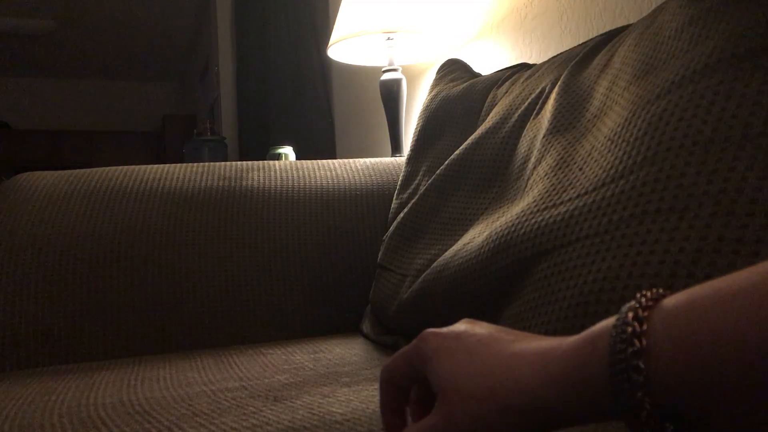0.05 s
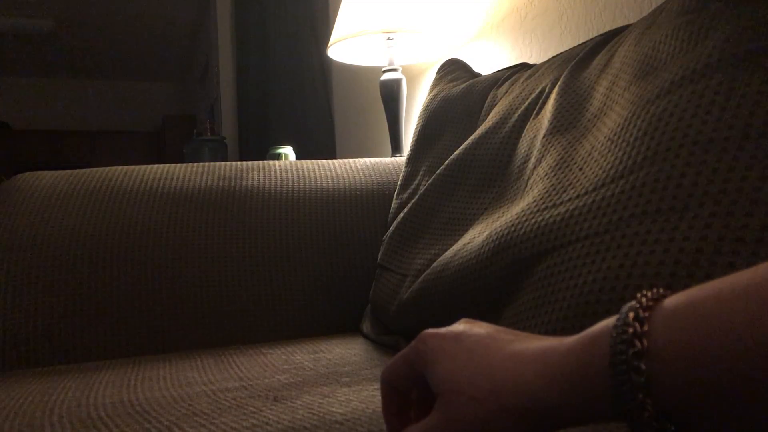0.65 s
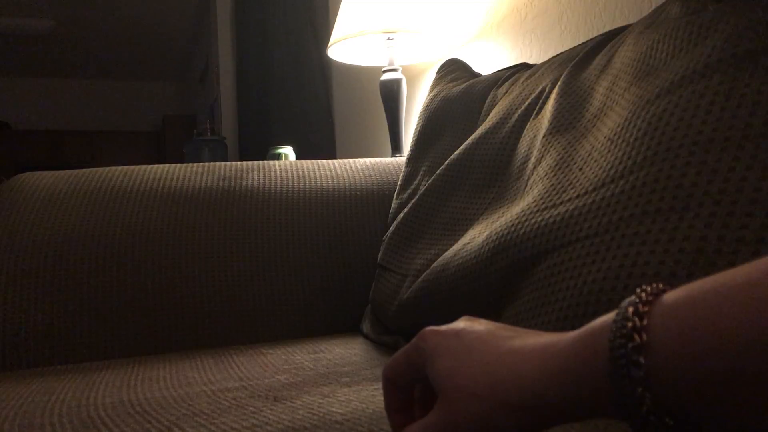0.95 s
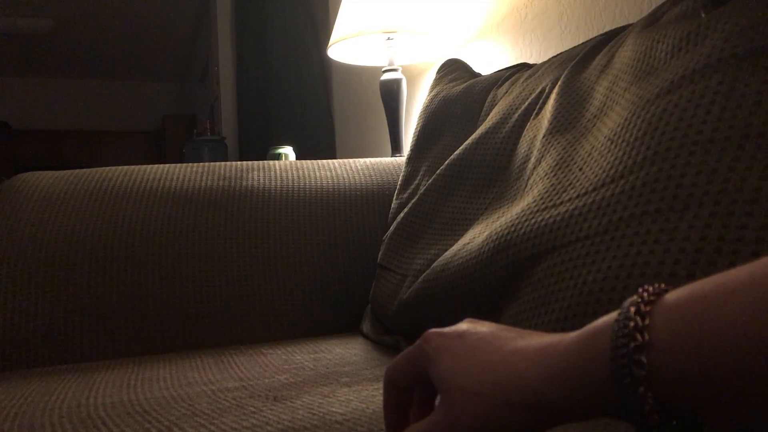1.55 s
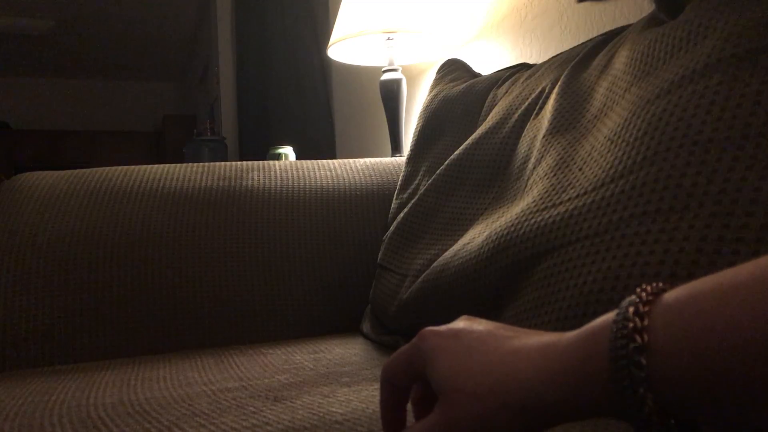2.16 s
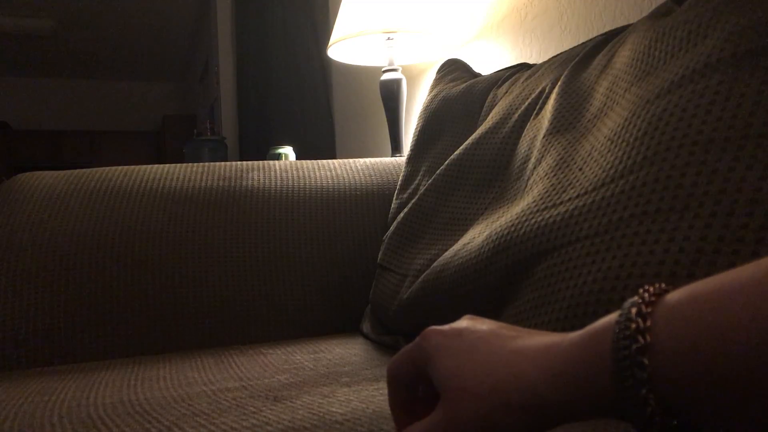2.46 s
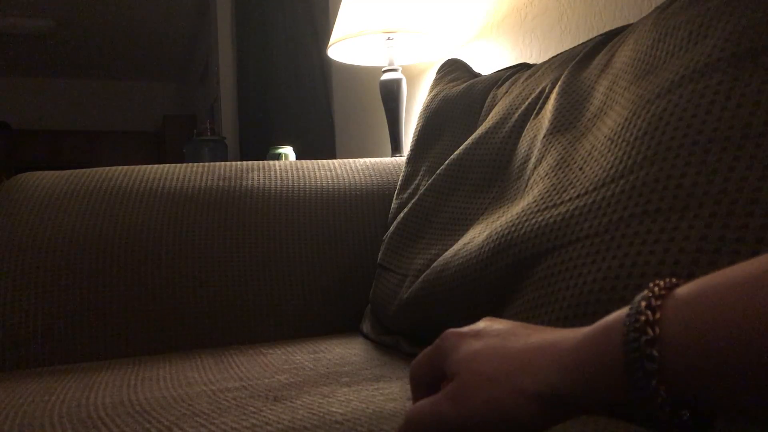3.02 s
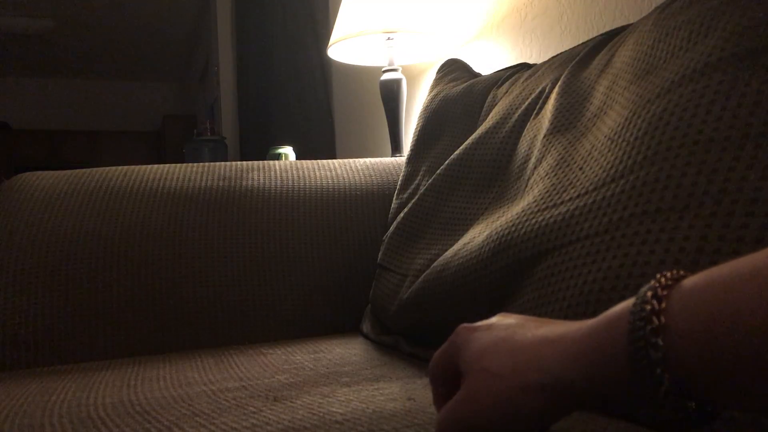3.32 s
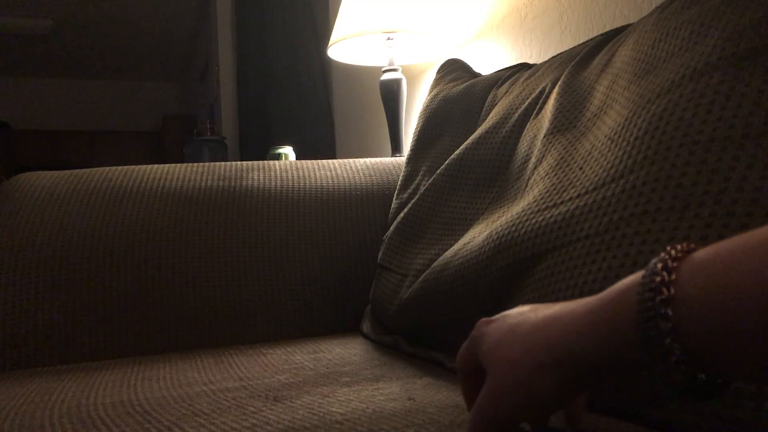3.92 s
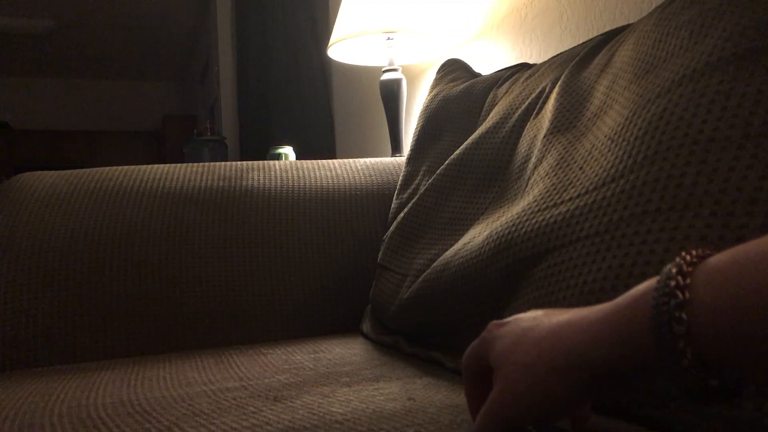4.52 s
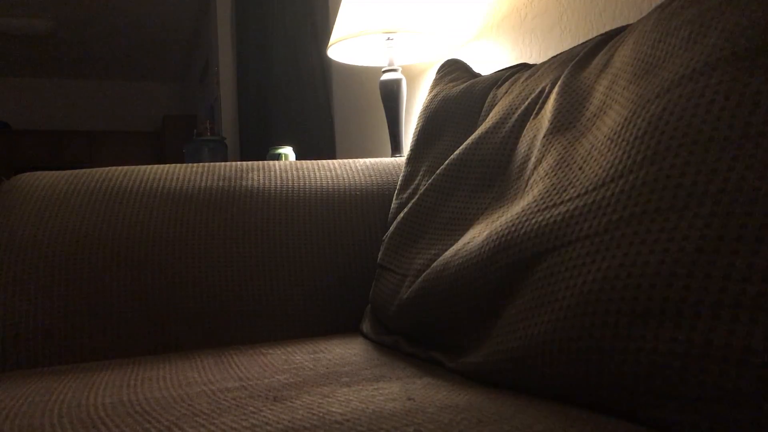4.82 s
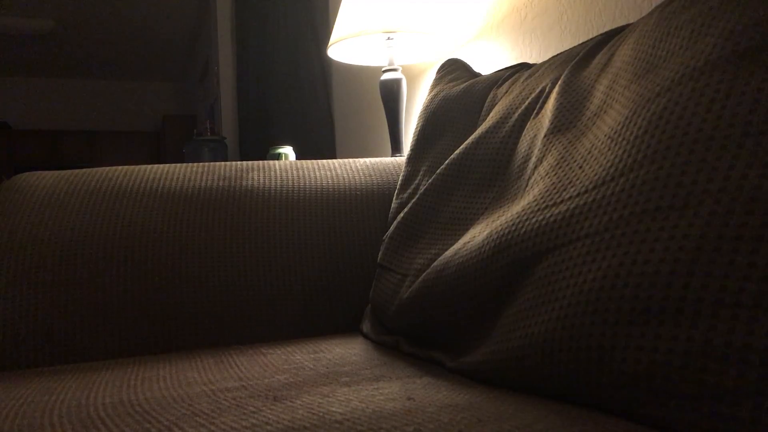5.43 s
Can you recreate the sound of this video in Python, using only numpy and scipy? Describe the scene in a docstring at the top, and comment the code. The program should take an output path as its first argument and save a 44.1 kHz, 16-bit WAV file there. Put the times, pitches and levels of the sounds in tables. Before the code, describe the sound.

Claws scratch lightly at a woven couch cover with small ticks and soft thumps, ending in a hand's sweep, over a low hum.

```python
"""Light scratching, close by, ticks and rasps as claws work to and fro on the woven cover of a couch.
The sound is stick-slip friction: each stroke rubs over the weave and catches threads; a thread that
slips free ticks, and the padding thumps with it. At the end a hand sweeps softly over the cover.
Behind it lies a quiet living room with a mains hum and a faint fan."""
import sys
import numpy as np
from scipy import signal
from scipy.fft import rfft, irfft
from scipy.io import wavfile

SR = 44100
rng = np.random.default_rng(int(sys.argv[2]) if len(sys.argv) > 2 else 0)


def wrap_up_sound(samples):
    """Save the sound to the file named by the first command line argument, as 16-bit audio."""
    columns = np.atleast_2d(samples).T
    # keep every value between -1 and 1, then stretch to whole-number steps
    tamed = np.clip(columns, -1, 1)
    steps = np.round(tamed * 32767).astype(np.int16)
    wavfile.write(sys.argv[1], SR, steps)


N = 250488

# loud threads slipping free: (time [s], cloth tick [dB], padding thump [dB], fibre crack [dB])
SNAPS = [(0.0077, -40.5, -55, -53), (0.0751, -33.5, -44, -55), (0.277, -32.5, -42, -46),
         (0.3127, -37, -35, -51), (0.3271, -38, -44, -45.5), (0.4007, -44, -37, -61),
         (0.5372, -34.5, -35, -53), (0.591, -44, -37.5, -48.5), (0.741, -39, -43.5, -46),
         (0.9552, -35.5, -44.5, -46), (1.0114, -34, -36.5, -52), (1.1796, -34.5, -45.5, -49),
         (1.1934, -40.5, -42, -48), (1.2327, -46, -45, -49), (1.2499, -30, -33.5, -39),
         (1.2666, -38.5, -47, -48), (1.319, -37.5, -46, -44), (1.3337, -41, -43.5, -43),
         (1.4487, -36.5, -43, -50.5), (1.4649, -37.5, -37, -43), (1.499, -34.5, -35.5, -43),
         (1.5178, -33, -38, -41.5), (1.5712, -40.5, -39.5, -59), (1.5795, -35, -45, -40),
         (1.6318, -45, -46, -43.5), (1.7104, -39.5, -49, -53), (1.8106, -44.5, -42, -50),
         (1.9643, -40, -44, -57), (2.2025, -35.5, -45.5, -45), (2.3828, -42, -45, -56),
         (2.4431, -37.5, -39.5, -47), (2.4622, -48, -62, -41.5), (2.4777, -37.5, -47.5, -47),
         (2.7137, -40, -62, -42.5), (2.7996, -33, -50.5, -53), (2.8958, -35.5, -41.5, -70),
         (2.9413, -42.5, -52, -50), (3.0178, -33.5, -35, -54), (3.0355, -35, -41, -46),
         (3.0571, -35.5, -32, -43), (3.1093, -40, -38, -57), (3.1698, -39, -37.5, -67),
         (3.1802, -37, -31.5, -45), (3.2768, -33, -29, -54), (3.306, -32, -28, -67),
         (3.3363, -28.5, -52, -43.5), (3.5269, -37.5, -36.5, -47), (3.565, -30.5, -31, -40.5),
         (3.5857, -37, -41, -43), (3.789, -41.5, -40, -55), (3.8123, -28.5, -24.5, -36.5),
         (3.818, -34.5, -31.5, -55), (3.8412, -38.5, -34.5, -44), (3.9975, -37.5, -39, -49),
         (4.033, -38, -43.5, -45), (4.1906, -44, -58, -52), (4.211, -36, -36.5, -47.5),
         (4.2231, -36, -32.5, -51), (4.258, -36.5, -57, -55), (4.413, -39.5, -38, -51.5),
         (4.4313, -38.5, -34, -57), (4.462, -33.5, -48, -54), (4.4831, -40, -35, -54),
         (4.6621, -41, -42.5, -61), (4.6855, -34.5, -39.5, -47.5), (4.6942, -36.5, -38, -51)]
# the cloth's response to one slip: (frequency [Hz], gain [dB])
SNAP_SPECTRUM = [(70, 1.5), (170, 34.5), (320, 38), (460, 28.5), (580, 33), (780, 20), (960, 29),
                 (1250, 20.5), (1900, 21.5), (2600, 12), (3500, 11.5), (5800, 10.5), (9000, 7), (16000, -8)]
# claws dig into the cover and draw back about four times a second; a return lasts until the next dig:
# (start of dig [s], turn [s], rasp of dig [dB], rasp of return [dB])
SCRATCHES = [(-0.03, 0.093, -64, -65), (0.22, 0.36, -61.5, -64), (0.46, 0.588, -64.5, -68),
             (0.689, 0.798, -62.5, -65.5), (0.912, 1.037, -63, -66), (1.139, 1.29, -61, -62),
             (1.398, 1.547, -62.5, -59), (1.648, 1.762, -61, -65), (1.88, 2.021, -68.5, -68),
             (2.14, 2.26, -65.5, -77), (2.42, 2.559, -62, -75), (2.687, 2.84, -64.5, -63),
             (2.959, 3.122, -62, -59.5), (3.24, 3.38, -56, -61), (3.499, 3.626, -64.5, -63),
             (3.759, 3.879, -59.5, -65.5), (3.959, 4.07, -68.5, -67), (4.193, 4.311, -62, -68),
             (4.397, 4.528, -59.5, -62), (4.638, 4.719, -59, -81)]
# body of the rubbing noise: (frequency [Hz], relative density [dB])
RASP_SPECTRUM = [(130, -5), (190, 6), (330, 16.5), (460, 5), (600, 7), (780, 0), (1000, -0.5), (1400, -1.5),
                 (2100, -8.5), (2900, -18), (3500, -15), (4800, -28), (7000, -30.5)]
# fibre hiss of the rubbing: (frequency [Hz], relative density [dB])
HISS_SPECTRUM = [(2500, -38), (4000, 1), (5800, 2.5), (9200, 3.5), (11700, -2.5), (16000, -9.5)]
# the cushion gives under a harder push: (time [s], relative peak [dB], resonance [Hz])
PUSHES = [(0.135, -45.5, 241), (0.384, -40.5, 255), (0.582, -40.5, 315), (3.291, -37, 176),
          (3.423, -37.5, 180), (3.699, -39, 187), (3.834, -36, 171), (4.222, -35.5, 173),
          (4.481, -39.5, 187), (4.555, -41, 176), (4.575, -41, 288)]
# tiny hard contacts: (time [s], peak level [dB])
CLICKS = [(2.9404, -37)]
# envelope of the hand's sweep: (time [s], level [dB])
SWEEP_LEVEL = [(4.7, -90), (4.74, -66.5), (4.8, -62), (4.85, -71.5), (4.95, -65.5), (5.12, -63),
               (5.25, -67), (5.4, -67.5), (5.55, -70.5), (5.68, -74)]
# its soft swish: (frequency [Hz], relative density [dB])
SWEEP_SPECTRUM = [(200, -3), (450, 3), (750, -5), (1050, 0), (1450, -5.5), (2100, -7.5), (3000, -12.5),
                  (4500, -21), (6000, -21.5), (9000, -19.5), (11000, -24), (16000, -25)]
# bands where the sound thins: (frequency [Hz], bandwidth [Hz], depth [0-1])
DIPS = [(2880, 400, .48), (4650, 950, .65), (7700, 900, .3), (10400, 900, .4)]
# envelope of the motor's drone: (time [s], rms level [dB])
DRONE_LEVEL = [(0, -63), (.3, -48.5), (1.9, -51), (2.2, -45), (3.1, -43.5), (3.5, -46.5), (4.0, -49),
               (5.68, -48)]
# humming appliances: (frequency [Hz], rms level [dB], unsteadiness [dB])
HUM_LINES = [(117.3, -56, 3), (117.9, -59, 2), (174.7, -62.5, -1.5), (239.6, -62.5, 2.5)]
# a fan's airy tones: (frequency [Hz], bandwidth [Hz], gain [dB])
FAN_MODES = [(585, 5.8, -0.5), (646, 3.1, 6), (908, 30, -17)]
# room tone: (frequency [Hz], relative density [dB])
ROOM_SPECTRUM = [(20, -33.5), (35, -7.5), (50, -6), (72, -2), (105, -1.5), (150, -5.5), (230, -16),
                 (330, -17), (480, -29), (640, -31), (800, -32), (1800, -38.5), (4500, -50.5), (16000, -58)]

RASP_SWELL, HISS_SWELL = (.54, 1.3), (.34, .6)  # (crest [share of the stroke], steepness)


def thread_snaps(stutter_per_s=550, stutter_db=-10, stutter_s=.0039, tear_s=.0004, ripple_db=2):
    """Impulse response: at each slip the padding thumps, the cover ticks and fibres crack on top."""
    size = 2048
    out, t = np.zeros(N + size), np.arange(size) / SR
    impulse = (t == 0) * 1.
    bin_hz = np.maximum(np.arange(size // 2 + 1) * SR / size, 1)
    log_hz = np.log(bin_hz)
    hz, response_db = np.transpose(SNAP_SPECTRUM)
    band_edges = np.log([430, 820, 3000, 5500])
    for s, thump, tick, crack in [(s, b - .5, m, c + 1.5) for s, m, b, c in all_slips()]:
        detune = .06 * rng.normal()
        gain_db = np.interp(log_hz + detune, np.log(hz), response_db)
        gain_db += np.interp(log_hz, band_edges, [thump, tick, tick, crack])
        # the wave returns from a seam, nearer or farther, and ripples the spectrum
        seam_s = rng.uniform(.0005, .0016)
        gain_db += ripple_db * np.cos(2 * np.pi * (bin_hz * seam_s + rng.random()))
        # fibres part one by one, which frays the top of the pulse
        tear = rng.standard_normal(size) * np.exp(-t / tear_s)
        tear /= np.linalg.norm(tear)
        release = tear + low_pass(impulse - tear, hz=5000, order=1)
        # a freed thread drags its neighbours loose in a short stutter
        neighbours = (rng.random(size) < stutter_per_s / SR) * rng.choice([-1, 1], size)
        stutter = neighbours * rng.random(size) * np.exp(-t / stutter_s)
        force = release + from_db(stutter_db) * stutter
        start = round(max(s, 0) * SR)
        out[start:start + size] += signal.fftconvolve(force, causal_pulse(gain_db))[:size]
    return dispersion(out[:N])


def all_slips(spread_db=3, recatch_s=.009, catches_per_stroke=3, scatter=.16):
    """Stick-slip: the loud slips, a weaker one after each, and small catches; rows as in SNAPS."""
    recatch_loss_db, over_rasp_db = np.array([[13, 8.5, 13], [10.5, 9.8, -1]])  # tick, thump, crack
    rows = list(SNAPS)
    # the claw catches each freed thread once more
    for s, *levels_db in SNAPS:
        delay, strength = rng.uniform(-1, 1, 2)
        weaker_db = np.array(levels_db) - recatch_loss_db + spread_db * strength
        rows.append((s + recatch_s * (1 + delay / 2), *weaker_db))
    # weak threads catch at random around the crest of each stroke
    for start, end, rasp_db, _ in strokes():
        for when, strength, *colour in rng.standard_normal((catches_per_stroke, 5)).clip(-2, 2):
            s = start + (RASP_SWELL[0] + scatter * when) * (end - start)
            levels_db = rasp_db + over_rasp_db + spread_db * (strength + np.array(colour) / 2)
            rows.append((s, *levels_db))
    return rows


def rubbing(slips_per_s=600, spread_db=5.5, turn_db=-80):
    """Sliding friction: smooth noise, and a grain of tiny slips that crowd in as pressure rises."""
    rasp_gain, hiss_gain = from_db(turn_db), 0
    for start, end, rasp_db, hiss_db in strokes():
        rasp_gain += from_db(rasp_db) * swell(start, end, *RASP_SWELL)
        hiss_gain += from_db(hiss_db) * swell(start, end, *HISS_SWELL)
    pressure = np.sqrt(rasp_gain / rasp_gain.max())
    sizes = from_db(spread_db * np.minimum(rng.exponential(1, N), 3)) * rng.choice([-1, 1], N)
    slips = sizes * (rng.random(N) < slips_per_s * pressure / SR)
    rasp = from_db(-1.5) * noise(RASP_SPECTRUM)
    rasp += from_db(3.5) * dispersion(coloured(slips, RASP_SPECTRUM))
    hiss = from_db(1.5) * noise(HISS_SPECTRUM)
    hiss += from_db(-5.5) * coloured(slips, HISS_SPECTRUM)
    return rasp_gain * rasp + hiss_gain * hiss


def strokes(dig_hiss_db=-75.5, return_hiss_db=-78, usual_rasp_db=-62, fade_db_per_s=.5, lift_s=5.3):
    """Load raises rasp more than hiss; one row a stroke: (start [s], end [s], rasp [dB], hiss [dB])."""
    ends = [row[0] for row in SCRATCHES[1:]] + [lift_s]
    rows = []
    for (start, turn, dig_db, return_db), end in zip(SCRATCHES, ends):
        dig, back = (start, turn, dig_db, dig_hiss_db), (turn, end, return_db, return_hiss_db)
        for begin, stop, rasp_db, hiss_db in dig, back:
            hiss_db += .36 * (rasp_db - usual_rasp_db) - fade_db_per_s * begin
            rows.append((begin, stop, rasp_db, hiss_db))
    return rows


def swell(start, end, crest, steepness):
    """Friction noise follows sliding speed: the gain of a stroke arches from rest to rest."""
    crest_s = start + crest * (end - start)
    ramp = np.interp(np.arange(N) / SR, [start, crest_s, end], [0, 1, 0])
    return np.sin(np.pi / 2 * ramp) ** steepness


def cushion_pushes(gain_db=-2, swell_s=.014, width_hz=28):
    """Damped resonance: a push sets off a short, dull shudder of the padding on its frame."""
    out, t = np.zeros(N), np.arange(SR // 5) / SR
    for s, peak_db, hz in PUSHES:
        force = rng.standard_normal(len(t)) * t * np.exp(-t / swell_s)
        shudder = resonate(force, [(hz, width_hz, 0)])
        add(out, s, low_pass(shudder, hz=2 * hz), peak_db + gain_db)
    return out


def sharp_click(decay_s=.00041):
    """Brief impact: a hard tip clicks without moving the cloth, so it radiates mainly treble."""
    out, t = np.zeros(N), np.arange(SR // 100) / SR
    for s, peak_db in CLICKS:
        burst = rng.standard_normal(len(t)) * np.exp(-t / decay_s)
        add(out, s, burst - low_pass(burst, hz=6000, order=1), peak_db)
    return out


def hand_sweep():
    """Smooth friction: skin glides over the weave without catching, in a soft swell of noise."""
    return envelope(SWEEP_LEVEL) * noise(SWEEP_SPECTRUM)


def dispersion(x, hz=650):
    """Dispersion: low frequencies cross the cloth more slowly, so a pulse becomes a falling chirp."""
    r = np.exp(-2 * np.pi * hz / SR)
    for _ in range(2):
        x = signal.lfilter([-r, 1], [1, -r], x)  # all-pass
    return x


def notched(x):
    """Notches: the sound thins out in a few broad bands."""
    for hz, width, depth in DIPS:
        x = x - depth * resonate(x, [(hz, width, 0)])
    return x


def living_room(x, t60_s=.088, wet_db=-17, wall_hz=3500):
    """Reverberation: soft furnishings absorb sound and leave a faint, dull tail."""
    t = np.arange(SR // 2) / SR
    tail = low_pass(rng.standard_normal(len(t)), hz=wall_hz) * from_db(-60 * t / t60_s) * (t > .004)
    return x + from_db(wet_db) * signal.fftconvolve(x, tail / np.linalg.norm(tail))[:N]


def hum(motor_hz=59.13):
    """Beating: a motor drones just under the mains rate; two close tones near its octave beat."""
    t = np.arange(N) / SR
    out = envelope(DRONE_LEVEL) * np.sin(2 * np.pi * motor_hz * t + .1 * drift(hz=1))
    for hz, db, unsteady_db in HUM_LINES:
        phase = 2 * np.pi * (hz * t + rng.random()) + .2 * unsteady_db * drift(hz=1)
        out += from_db(db + unsteady_db * drift(hz=2)) * np.sin(phase)
    return np.sqrt(2) * out


def fan(rms_db=-71.5):
    """Resonance: narrow modes pick a fan's airy tones out of broadband noise."""
    return from_db(rms_db) * rms_one(resonate(rng.standard_normal(N), FAN_MODES))


def room_tone(rms_db=-50):
    """Ambient noise: a steady floor, strongest in the bass."""
    return from_db(rms_db) * noise(ROOM_SPECTRUM)


def from_db(db):
    """Decibels to amplitude ratio."""
    return 10 ** (np.asarray(db) / 20)


def rms_one(x):
    """Normalisation to rms 1."""
    return x / np.sqrt(np.mean(x ** 2) + 1e-20)


def envelope(curve):
    """Amplitude at every sample, interpolated from (time [s], level [dB])."""
    s, db = np.transpose(curve)
    return from_db(np.interp(np.arange(N) / SR, s, db))


def drift(hz):
    """Low-passed noise: a slow random wander of rms 1."""
    step, settle = 40, 2000  # samples per point; points for the filter to settle
    r = np.exp(-2 * np.pi * hz * step / SR)
    white = rng.standard_normal(N // step + settle + 2)
    slow = signal.lfilter([1], [1, -2 * r, r * r], white)[settle:]
    return np.interp(np.arange(N) / step, np.arange(len(slow)), rms_one(slow))


def coloured(x, spectrum):
    """Spectral shaping by (frequency [Hz], gain [dB]), scaled to rms 1."""
    hz, db = np.transpose(spectrum)
    bin_hz = np.maximum(np.arange(N // 2 + 1) * SR / N, 1)
    gain = from_db(np.interp(np.log(bin_hz), np.log(hz), db))
    return rms_one(irfft(rfft(x) * gain, N))


def noise(spectrum):
    """Gaussian noise with this spectrum and rms 1."""
    return coloured(rng.standard_normal(N), spectrum)


def resonate(x, modes):
    """Superposition of damped modes, alternating in sign."""
    out = 0
    for k, (hz, width, db) in enumerate(modes):
        r = np.exp(-np.pi * width / SR)
        gain = (-1) ** k * from_db(db) * (1 - r * r) / 2
        feedback = [1, -2 * r * np.cos(2 * np.pi * hz / SR), r * r]
        out = out + gain * signal.lfilter([1, 0, -1], feedback, x + 1e-18)
    return out


def low_pass(x, hz, order=2):
    """Low-pass filtering rounds off the treble."""
    return signal.sosfilt(signal.butter(order, hz, fs=SR, output="sos"), x)


def causal_pulse(gain_db):
    """Minimum phase: the sharpest pulse with this spectrum that starts at time zero."""
    cepstrum = irfft(np.log(from_db(gain_db)))
    half = len(cepstrum) // 2
    fold = np.r_[1, np.full(half - 1, 2), 1, np.zeros(half - 1)]
    return irfft(np.exp(rfft(cepstrum * fold)))


def add(track, s, sound, peak_db):
    """Superpose a short sound at a time and a peak level."""
    start = round(s * SR)
    track[start:start + len(sound)] += (from_db(peak_db) * sound / np.abs(sound).max())[:N - start]


def scene():
    """Superposition: scratching and a last sweep of the hand, over fan, room tone and hum."""
    scratching = living_room(notched(thread_snaps() + rubbing() + cushion_pushes() + sharp_click()))
    air = fan() + room_tone()
    return (scratching + notched(hand_sweep()) + hum() + air)[None]


def record(dry):
    """Band limiting: a steep low-pass removes the treble above 15.9 kHz."""
    return signal.sosfilt(signal.ellip(12, .1, 80, 15900, fs=SR, output="sos"), dry)


dry = scene()
out = record(dry)
wrap_up_sound(out)
```